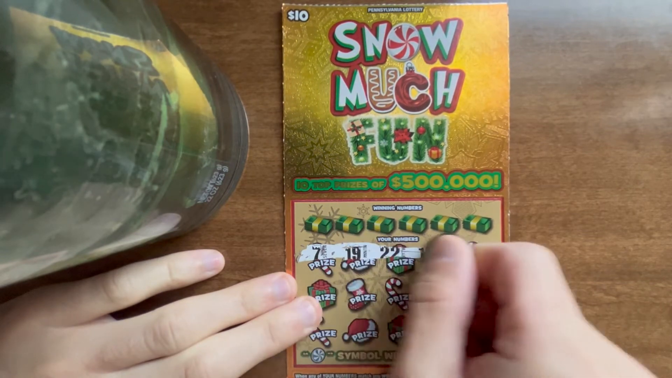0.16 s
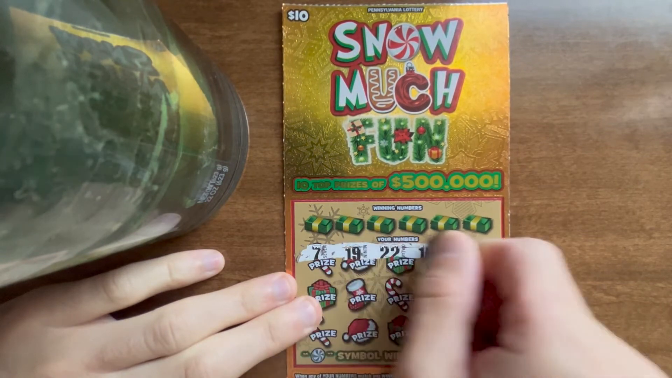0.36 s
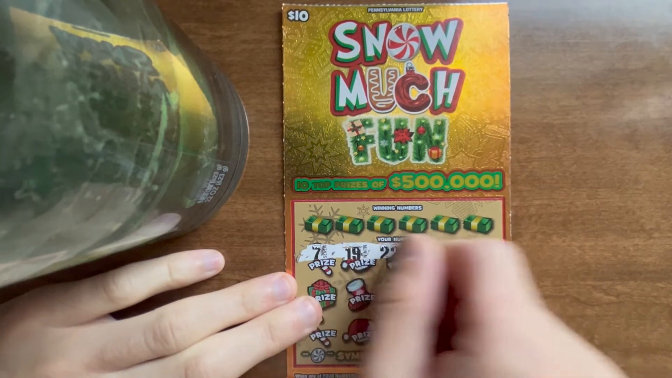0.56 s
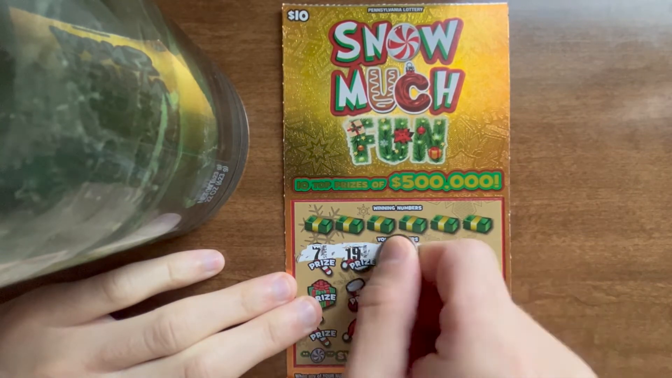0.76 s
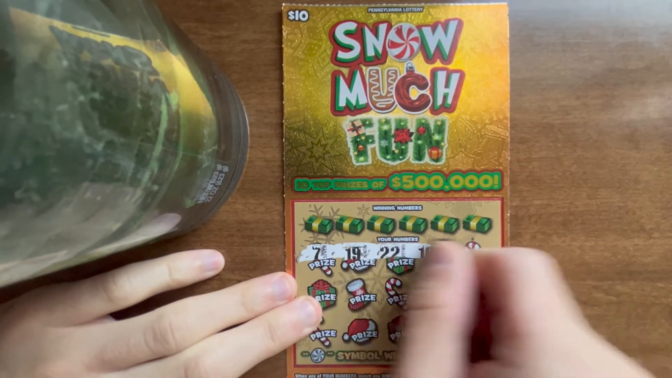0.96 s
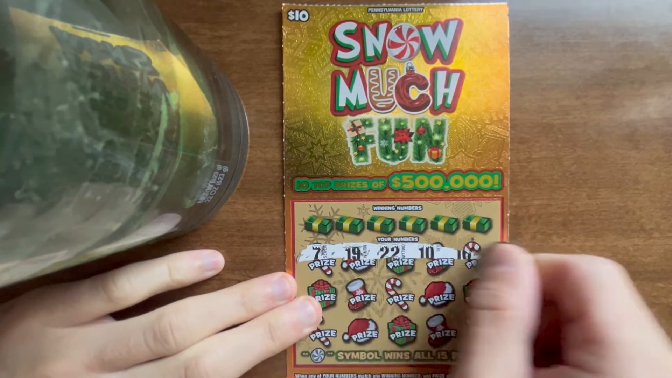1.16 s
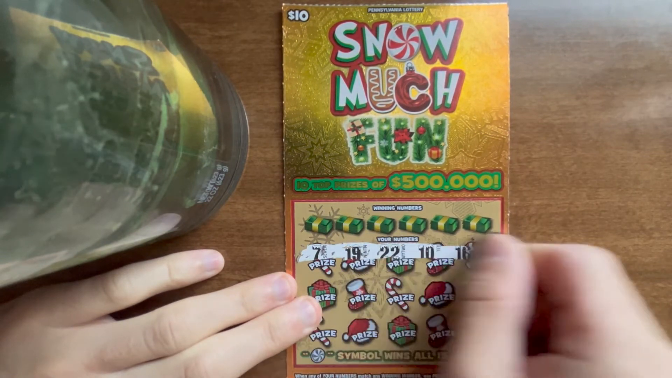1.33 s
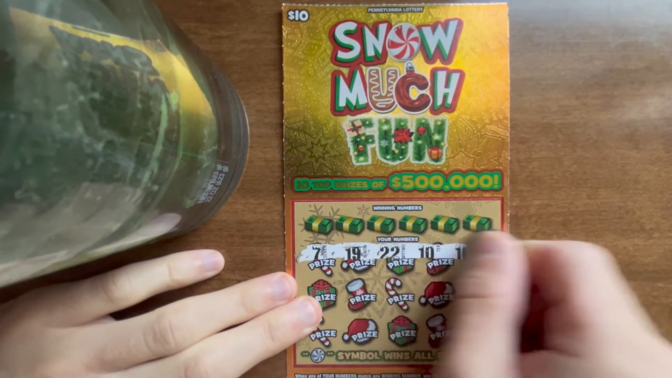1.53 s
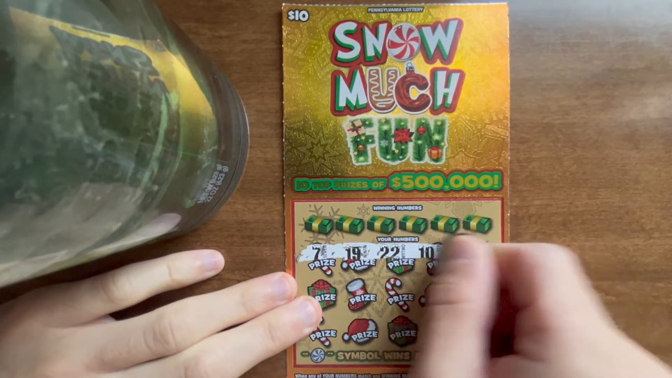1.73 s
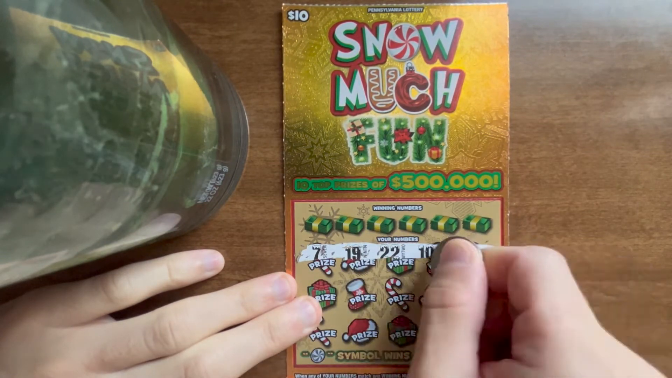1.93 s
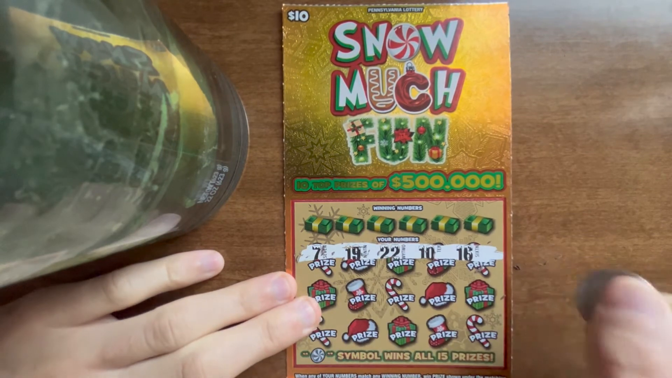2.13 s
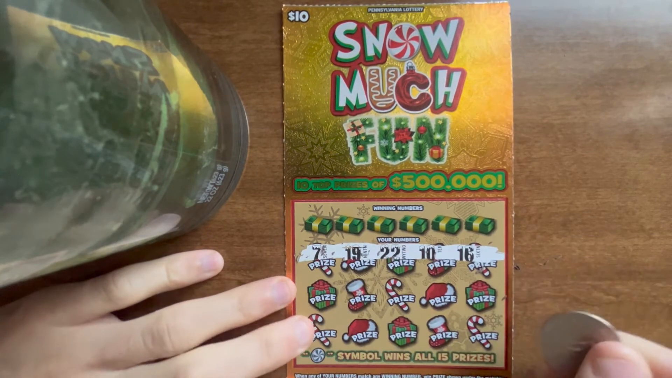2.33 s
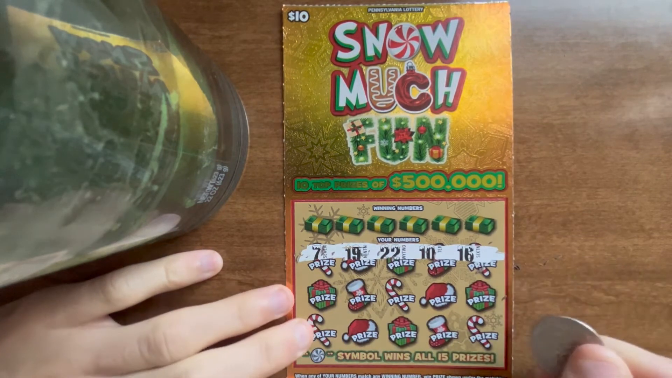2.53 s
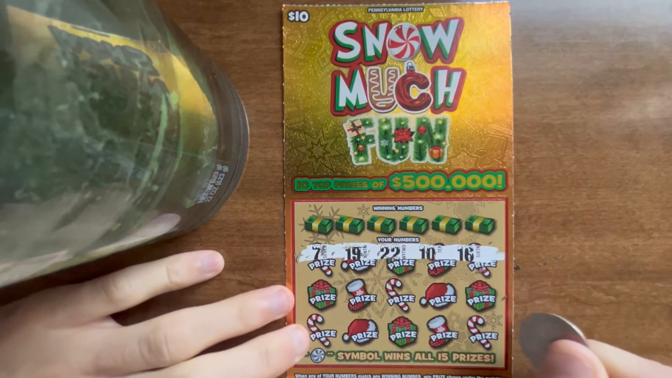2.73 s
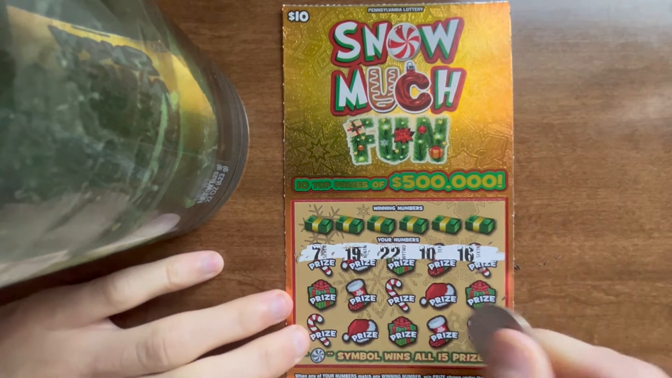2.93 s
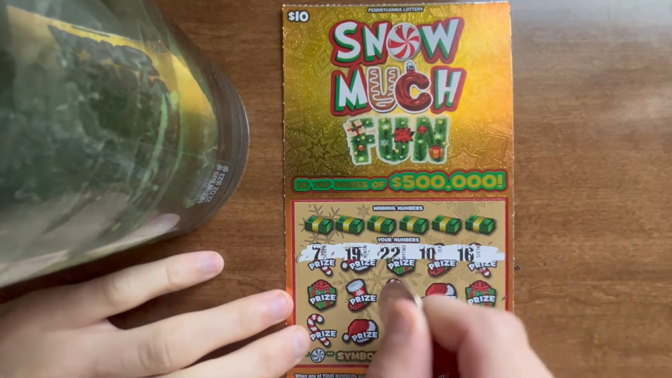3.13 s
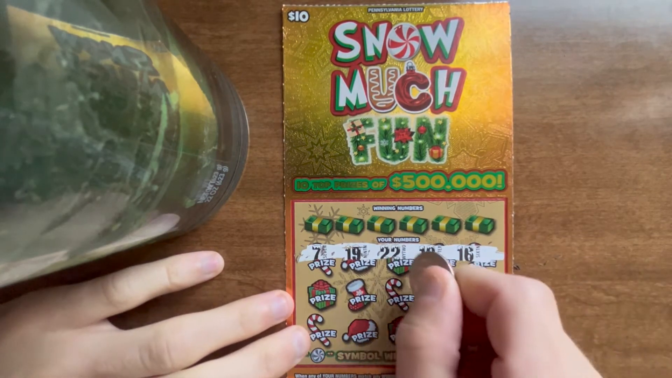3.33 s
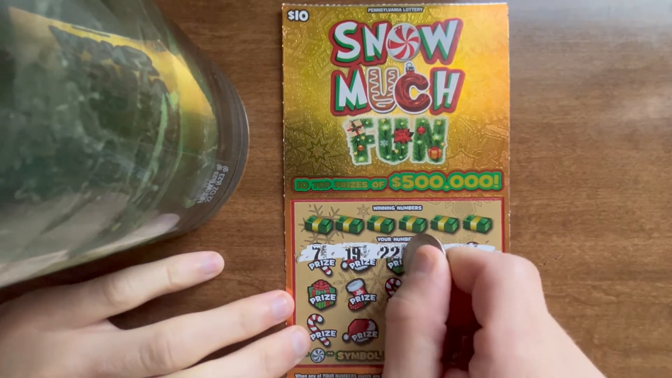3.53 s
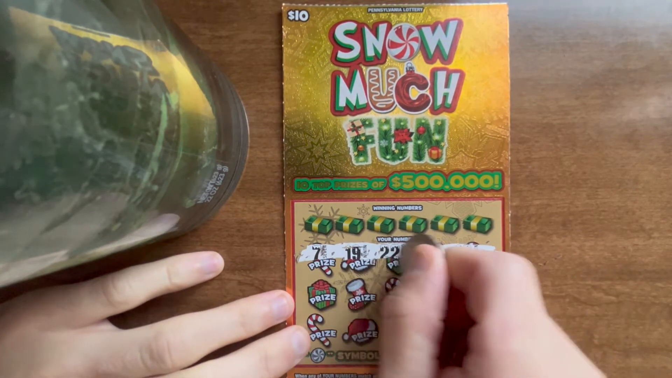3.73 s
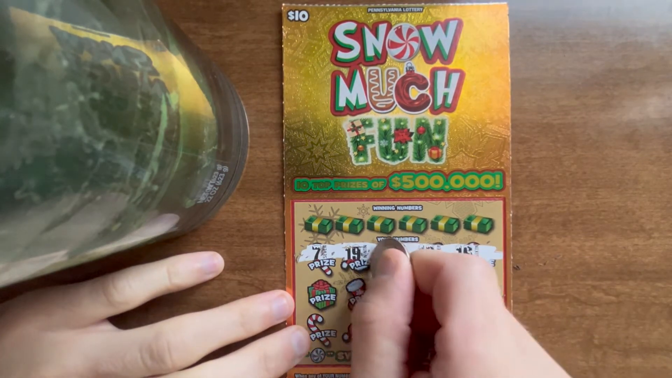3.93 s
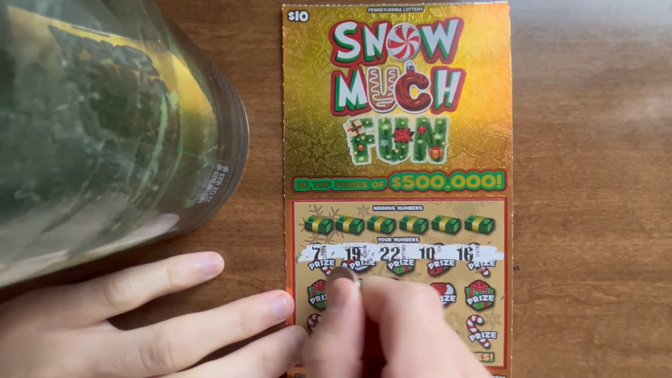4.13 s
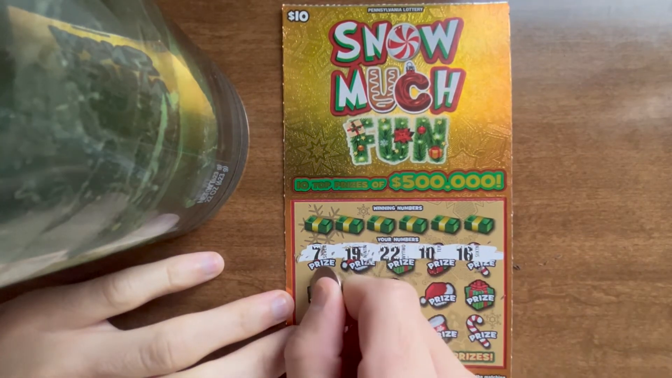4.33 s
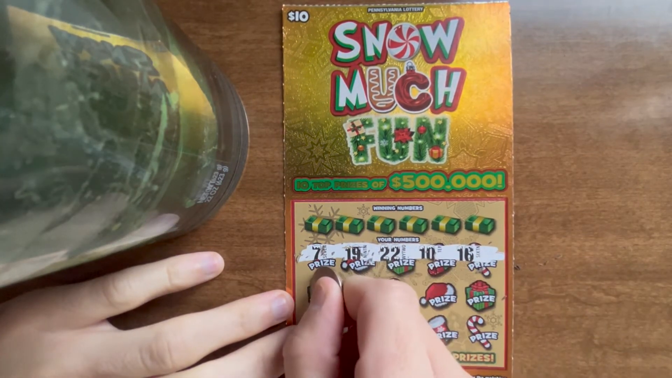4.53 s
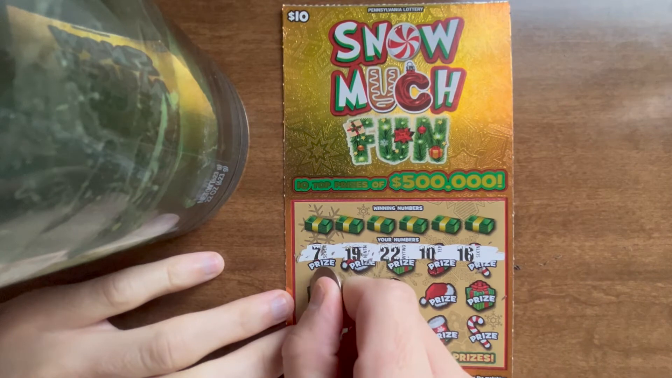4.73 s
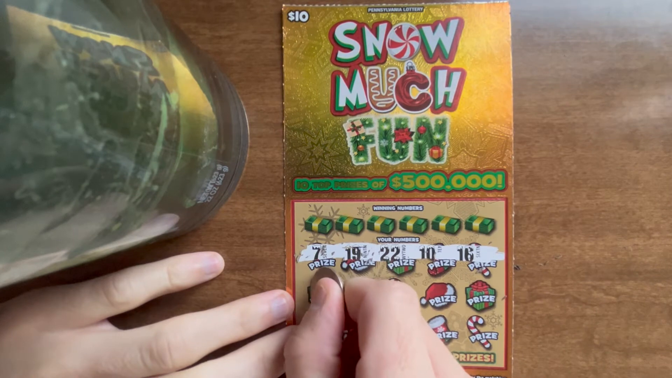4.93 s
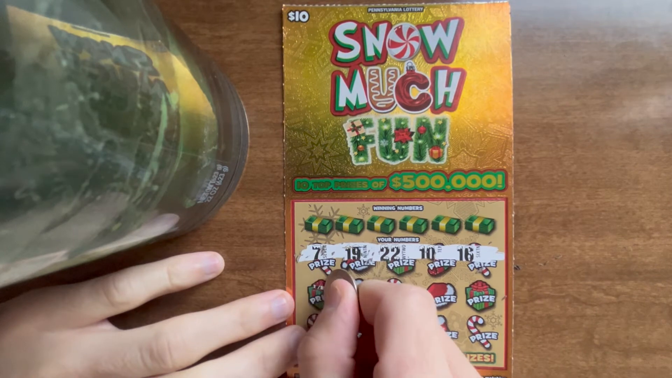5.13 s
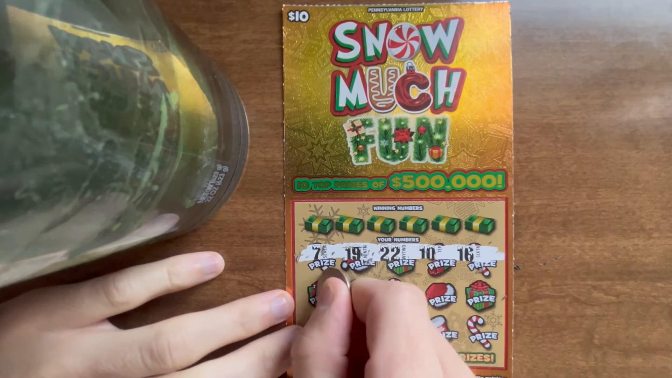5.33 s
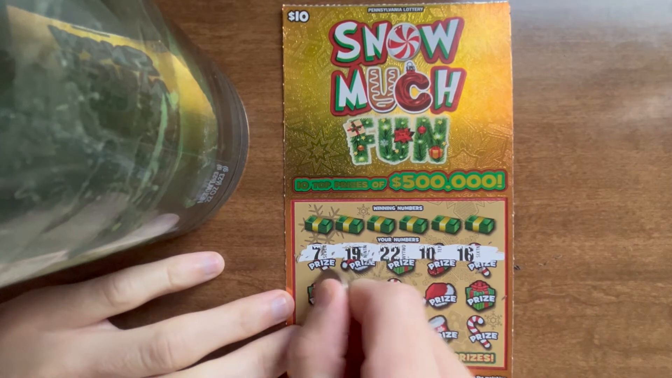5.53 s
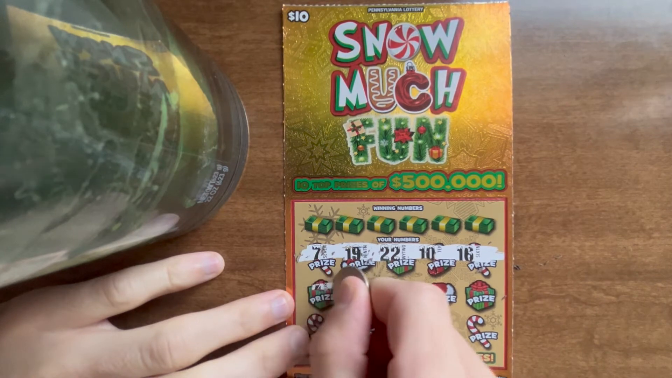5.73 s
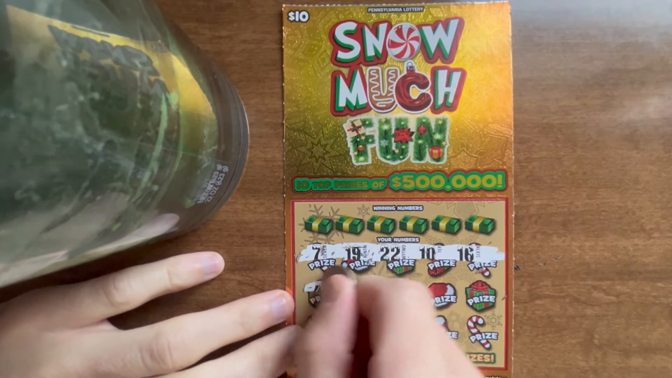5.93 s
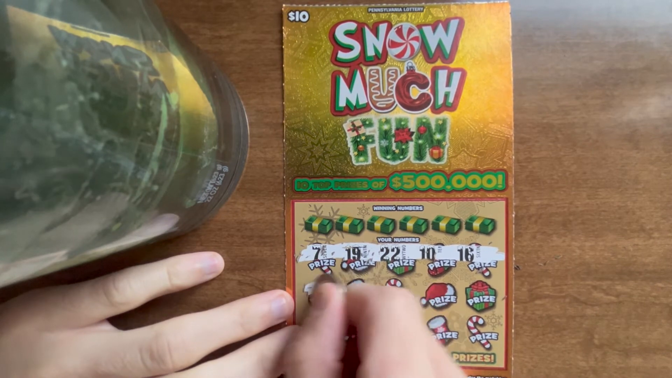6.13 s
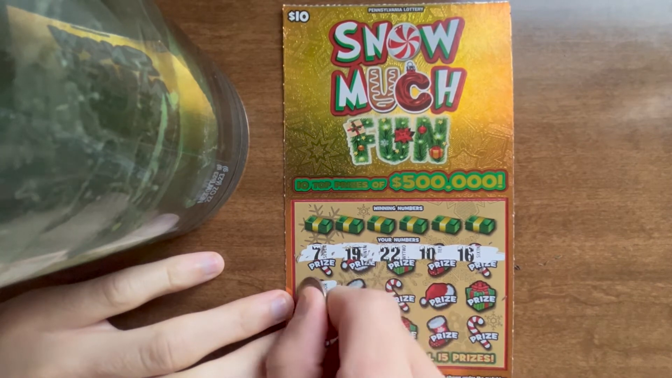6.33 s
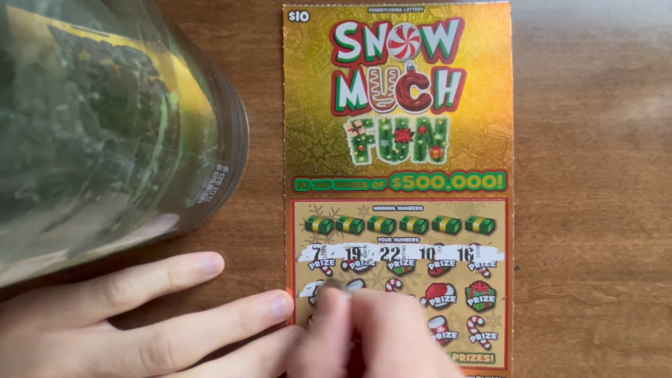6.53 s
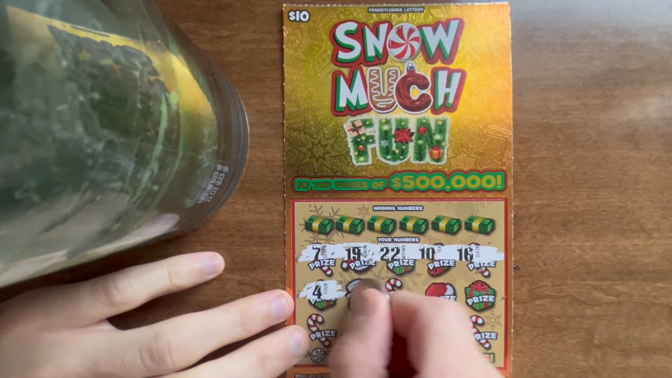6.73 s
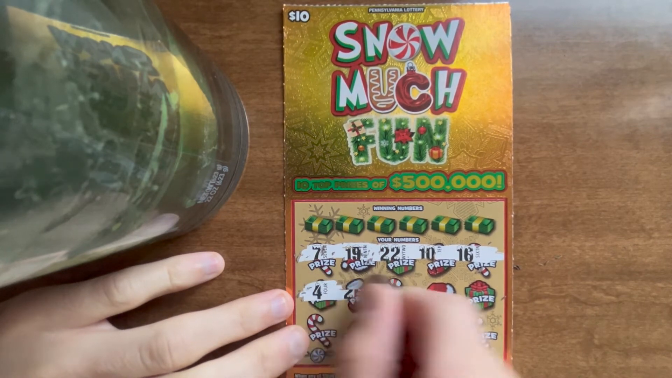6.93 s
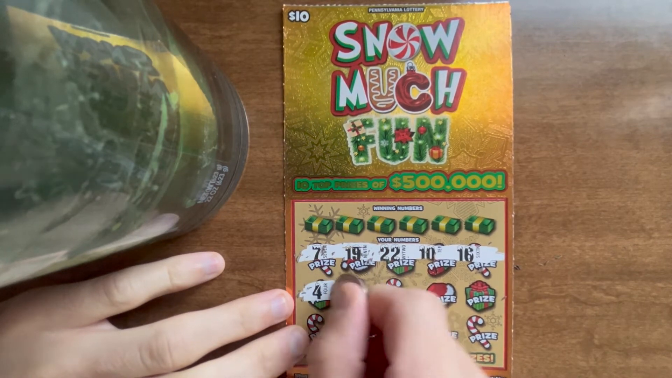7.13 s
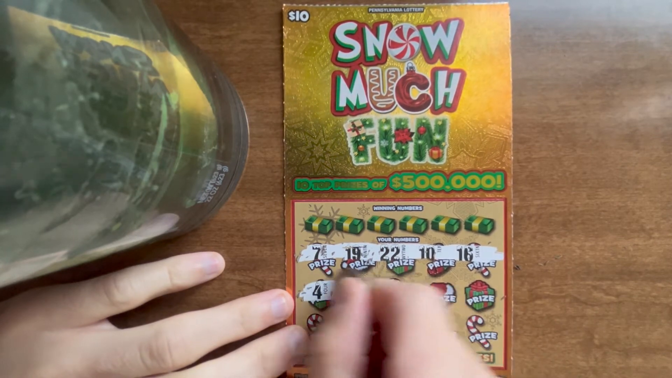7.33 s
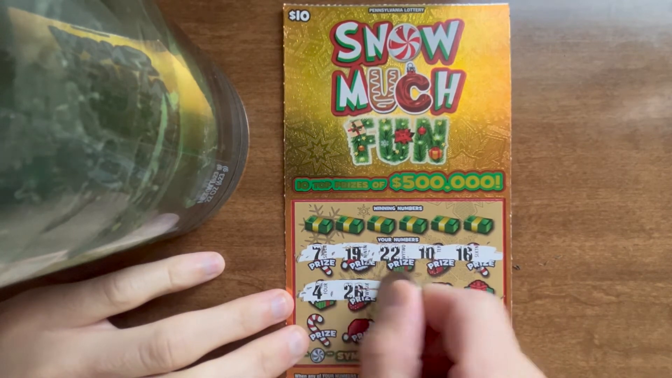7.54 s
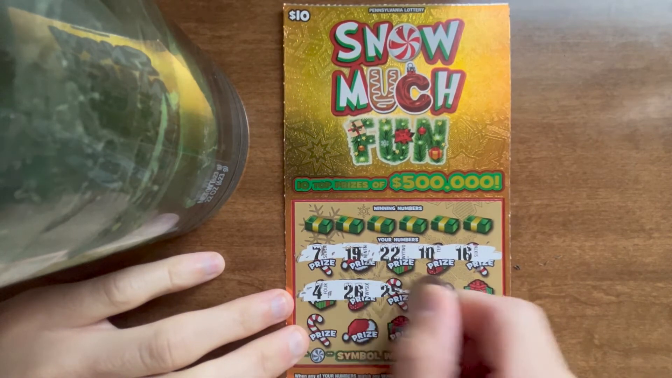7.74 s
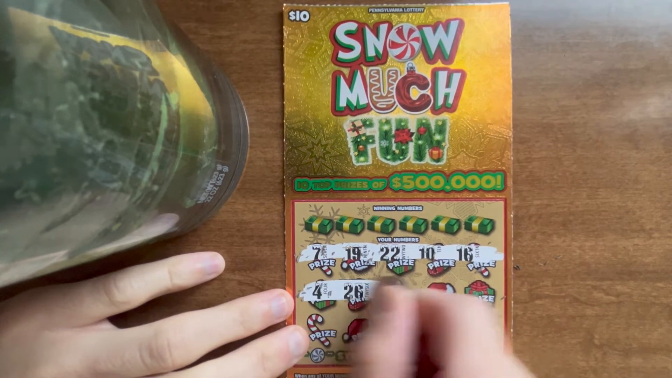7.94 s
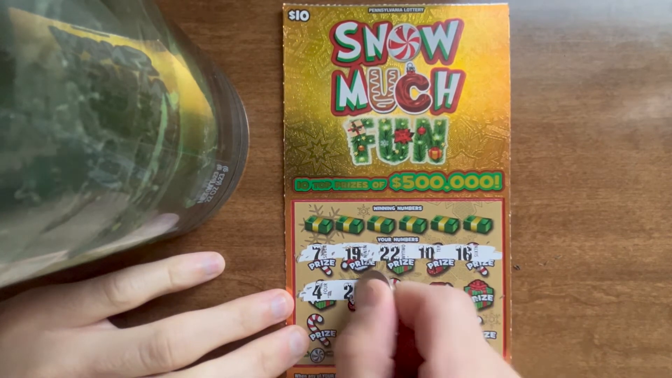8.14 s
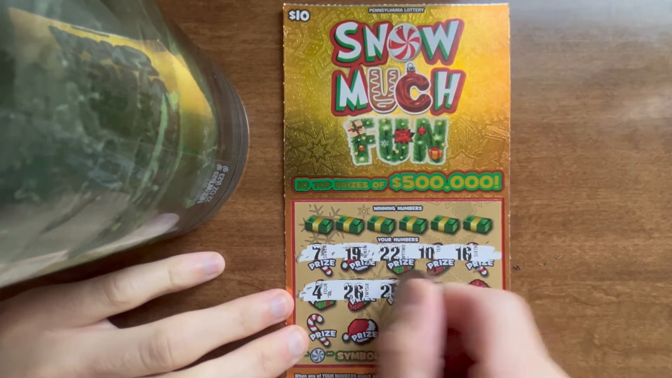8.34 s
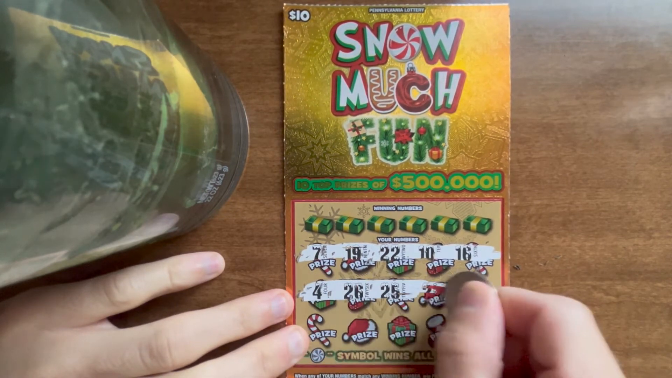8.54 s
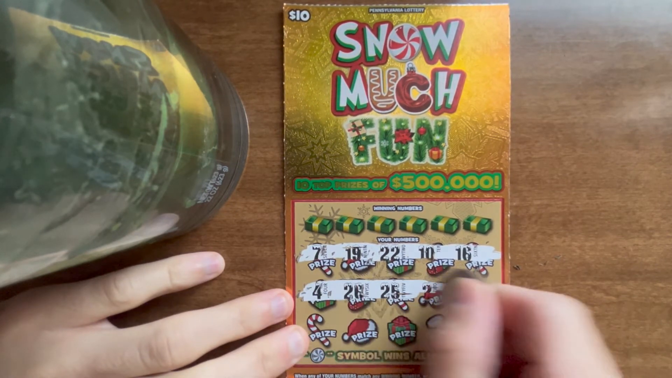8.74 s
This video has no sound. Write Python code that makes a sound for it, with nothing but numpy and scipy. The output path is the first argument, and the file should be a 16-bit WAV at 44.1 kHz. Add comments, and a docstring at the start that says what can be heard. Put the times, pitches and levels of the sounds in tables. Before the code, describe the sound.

Close, brisk coin scratching rasps over card in two long bursts, with small taps and low table thumps between, in a small quiet room.

```python
"""Coin scratching a paper ticket

A coin scratches the coating off a paper ticket on a wooden table, close to a two-port microphone in a small room.
It goes to and fro about four times a second: a bright, biting push, then a duller pull. Noise grains and uneven
slips ring coin, card and table top in four voices; low noise bands are the hand rocking and thumping the table.
Coin and fingers tap during the strokes and in the pauses, over short echoes, faint hiss, a drone and a hum."""
import sys
import numpy as np
from scipy import signal
from scipy.fft import rfft, irfft
from scipy.io import wavfile
from scipy.ndimage import uniform_filter1d

SR = 44100
rng = np.random.default_rng(int(sys.argv[2]) if len(sys.argv) > 2 else 0)


def store_wav(level_fs):
    """Save 16-bit WAV to argv[1]."""
    pcm = np.round(np.clip(np.atleast_2d(level_fs), -1, 1) * 32767)
    wavfile.write(sys.argv[1], SR, pcm.T.astype(np.int16))


N = 386757
TIME = np.arange(N) / SR
BODY_TAPS = 8192  # length of the body response in samples


def from_db(db):
    """Decibels to gain."""
    return 10 ** (np.asarray(db) / 20)


def unit(x):
    """Scales to rms 1."""
    return x / np.sqrt(np.mean(x ** 2) + 1e-20)


def steadied(x, count):
    """Evens out the power of a sound over spans of count samples."""
    power = uniform_filter1d(np.mean(x ** 2, axis=0), count)
    return x / np.sqrt(np.abs(power) + 1e-12)


def read(points, hz):
    """Reads every column of a table on a log-frequency axis."""
    f, *columns = np.transpose(points)
    return np.array([np.interp(np.log(hz + 1), np.log(f + 1), c) for c in columns])


def waver(rate_hz):
    """Smooth random motion of rms 1 that changes up to about this rate."""
    hz = np.fft.rfftfreq(N, 1 / SR)
    spectrum = rfft(rng.standard_normal(N)) / (1 + (hz / rate_hz) ** 4)
    return unit(irfft(spectrum, N))


def narrow_noise(hz, width_hz):
    """Complex noise in one resonance; its real part has rms about 1."""
    r = np.exp(-1.5 * np.pi * width_hz / SR)  # two equal poles
    a, b = signal.lfilter([1], [1, -2 * r, r * r], rng.standard_normal((2, N)))
    return (unit(a) + 1j * unit(b)) * np.exp(2j * np.pi * hz * TIME)


def speed(start, end, fastest):
    """One stroke of the hand: from rest up to speed 1 and back to rest."""
    u = np.arange(int((end - start) * SR)) / SR / (end - start)
    fastest = np.clip(fastest, .05, .95)
    return np.sin(np.pi / 2 * np.minimum(u / fastest, (1 - u) / (1 - fastest)))


# after each turn the coin glides with part of its grip, then digs in quickly
GLIDE_GRIP, DIG_IN_S = 0.65, .01


def strokes(rows, effort_law, speed_law):
    """Strength of a run of strokes, as powers of their effort and speed; each glides in lightly, then digs."""
    out = np.zeros(N + 2 * SR)  # a second spare at either end
    for start, end, effort_db, fastest, glide_s in rows:
        motion = speed(start, end, fastest)
        grip = np.interp(TIME[:len(motion)], [glide_s, glide_s + DIG_IN_S], [GLIDE_GRIP, 1])
        stroke = from_db(effort_law * effort_db) * (grip * motion) ** speed_law
        out[SR + int(start * SR):][:len(motion)] += stroke
    return out[SR:SR + N]


def jolts(rows, rise_s):
    """Sudden jolts (t/s, decay time/s, gain) that rise quickly and die away."""
    out = np.zeros(N)
    for s, decay, gain in rows:
        span = slice(int(s * SR), int(s * SR) + SR // 2)
        age = np.maximum(TIME[span] - s, 0)
        out[span] += gain * np.minimum(age / rise_s, 1) * np.exp(-age / decay)
    return out


def knocks(rows, contact_s=0.002):
    """Each jolt starts with one clean blow, whose energy grows with the jolt's size and length up to contact_s."""
    out = np.zeros(N)
    for s, decay, gain in rows:
        out[int(s * SR) + 30] = gain * np.sqrt(min(decay, contact_s) * SR / 2)
    return out


# colour of the faint hiss: f/Hz, relative level/dB per Hz
HISS_COLOUR = [(15, -63), (25, -20.5), (43, 0), (64, -5), (80, -16.5), (114, -13), (190, -12), (240, -9),
               (300, -23), (420, -26), (775, -35.5), (1700, -35.5), (3000, -40), (4700, -39.5),
               (7000, -45.5), (11000, -50), (13000, -54.5), (16000, -51)]
HISS_DB = -68.5
# low drone of the room: f/Hz, width/Hz, level/dB
DRONE = [(55, 7.8, -74.5), (114.3, 24, -73.5), (158.5, 12, -82.5)]
HUM_HZ, HUM_DB = 236, -73.5


def background():
    """Hiss is coloured noise, the drone noise in low resonances, the hum a sine whose pitch wavers slightly."""
    hz = np.fft.rfftfreq(N, 1 / SR)
    mid, side = rfft(rng.standard_normal((2, N))) * from_db(read(HISS_COLOUR, hz))
    # side against mid: f/Hz, level/dB
    side = side * from_db(read([(100, -1.6), (600, 1), (5000, -1.5)], hz)[0])
    hiss = irfft(np.array([mid + side, mid - side]), N)
    drone = sum(from_db(db) * narrow_noise(f, width).real for f, width, db in DRONE)
    turns = np.cumsum(HUM_HZ + 1.5 * waver(4.4)) / SR
    hum = from_db(HUM_DB) * np.sqrt(2) * np.sin(2 * np.pi * turns)
    return from_db(HISS_DB) * unit(hiss) + drone + hum


# room decay: f/Hz, t60/s
ROOM_DECAY = [(100, 0.67), (400, 0.18), (1500, 0.18), (5000, 0.2), (14000, 0.11)]


def room(x):
    """Sparse reflections from the walls, each band dying at its own speed."""
    count = SR // 2
    signs = rng.choice([-1., 1.], (2, count))
    hits = rng.random((2, count)) < 3000 / SR  # about 3000 reflections a second
    taps = signs * hits * (TIME[:count] > .004)
    hz, t, z = signal.stft(taps, SR, nperseg=256)
    tail = signal.istft(z * from_db(-60 * t / read(ROOM_DECAY, hz).T), SR, nperseg=256)[1]
    tail /= np.linalg.norm(tail, axis=1, keepdims=True)
    return signal.oaconvolve(x, tail, axes=1)[:, :N]


# the coin is pushed, edge first: start t/s, end t/s, effort/dB,
# share of the stroke at which it is fastest, glide before it digs in/s
PUSHES = [(-0.027, 0.126, 1.5, 0.61, 0.049), (0.233, 0.396, 3, 0.45, 0.037),
          (0.462, 0.626, -2.0, 0.73, 0.045), (0.713, 0.878, -1, 0.78, 0.042),
          (0.971, 1.133, -2, 0.58, 0.037), (1.225, 1.365, 3.5, 0.45, 0.061),
          (1.444, 1.585, 1.5, 0.41, 0.023), (1.649, 1.791, -3, 0.85, 0.045),
          (1.889, 2.051, -7.5, 0.46, 0.027), (3.613, 3.748, -17, 0.49, 0.035),
          (5.298, 5.431, -7.5, 0.49, 0.032), (5.555, 5.715, -6, 0.68, 0.047),
          (5.81, 5.987, -3.0, 0.57, 0.026), (6.073, 6.194, -2.5, 0.68, 0.053),
          (6.31, 6.444, 0.5, 0.64, 0.0095), (6.562, 6.698, -4.5, 0.98, 0.017),
          (6.823, 6.987, 3.5, 0.55, 0.064), (7.106, 7.243, 3, 0.39, 0.018), (7.35, 7.507, 3, 0.45, 0.042),
          (7.607, 7.752, 0.5, 0.74, 0.006), (7.85, 8.019, 2, 0.55, 0.079), (8.113, 8.271, 3.0, 0.47, 0.043),
          (8.357, 8.505, -1.5, 0.8, 0.023), (8.61, 8.776, -2.0, 0.61, 0.04)]
# the coin is pulled back, edge trailing: same columns as the pushes
PULLS = [(0.091, 0.27, -2.5, 0.35, 0.033), (0.346, 0.504, -3, 0.45, 0.038), (0.605, 0.763, 0, 0.15, 0.022),
         (0.856, 1.03, 3, 0.26, 0.022), (1.101, 1.261, -2, 0.25, 0.027), (1.328, 1.464, 0, 0.22, 0.03),
         (1.534, 1.682, -6, 0.65, 0.041), (1.793, 1.921, 1, 0.08, 0.015), (3.501, 3.651, -11, 0.37, 0.05),
         (3.747, 3.907, -3, 0.41, 0.025), (4.901, 5.113, -8, 0.15, 0.0069),
         (5.127, 5.296, -13, 0.36, 0.041), (5.407, 5.492, -8, 0.72, 0.039),
         (5.469, 5.566, -6.5, 0.53, 0.03), (5.697, 5.839, -2.0, 0.52, 0.046),
         (5.973, 6.094, -3, 0.46, 0.011), (6.158, 6.333, -1.0, 0.57, 0.045),
         (6.408, 6.591, -1.5, 0.55, 0.021), (6.702, 6.862, 1.0, 0.13, 0.02),
         (6.961, 7.107, 0.5, 0.37, 0.023), (7.207, 7.354, 0.5, 0.49, 0.025), (7.496, 7.628, -1, 0.1, 0.013),
         (7.736, 7.893, 3.5, 0.32, 0.01), (7.986, 8.125, 1, 0.48, 0.023), (8.228, 8.369, 1, 0.48, 0.03),
         (8.497, 8.658, 0, 0.14, 0.022)]
# weight of the hand on the table before it rocks, one list a spell: t/s, level/dB
HAND_WEIGHT = [
    [(0, -47), (0.45, -48), (0.9, -48.5), (1.3, -46.0), (1.65, -47), (2.0, -49), (2.13, -73)],
    [(3.5, -54.5), (3.7, -59.5), (3.85, -48), (4.0, -60)],
    [(4.89, -55.5), (4.98, -51.5), (5.5, -52), (6.1, -52.5), (6.8, -49), (7.4, -49), (8.1, -47),
     (8.77, -47)],
]
# the hand bumps the table: t/s, level/dB
THUMPS = [(0.649, -39), (0.889, -36), (1.07, -41), (1.804, -32), (1.996, -45.5), (2.163, -49), (2.241, -59),
          (2.305, -52), (2.61, -56.5), (3.446, -44.5), (3.599, -45), (3.799, -48.5), (4.08, -61.5),
          (4.245, -59), (5.15, -46), (5.777, -42), (6.27, -43), (7.044, -54), (7.31, -43), (7.82, -39),
          (8.08, -53), (8.452, -40), (8.554, -45), (8.6, -44)]
THUMP_RISE_S, THUMP_DECAY_S = 0.0027, .05
# low modes of the table: f/Hz, width/Hz, relative level/dB, left minus right/dB, left lead/rad
TABLE_MODES = [(64.7, 18, -5.5, 5, 0.91), (107.4, 18, 1.5, 0.5, -1.3), (143, 35, -3, -1, -1.7),
               (187.3, 93, -7, 5.5, 0.67), (260.8, 15, -2.5, -1, -1.73)]
# shaking per unit of weight; it lags the stroke
ROCK_REST, ROCK_PUSH, ROCK_PULL, ROCK_LAG_S = 0.73, .15, .55, 0.027
UNLIKE_AT_PORTS = .65  # share of independent noise between the ports


def table():
    """The rocking hand and its bumps shake the low table modes, which reach the two ports a little differently."""
    weight = np.zeros(N)
    for spell in HAND_WEIGHT:
        t, db = np.transpose(spell)
        weight += np.interp(TIME, t, from_db(db), left=0, right=0)
    weight = uniform_filter1d(weight, size=1500)  # the hand settles and lifts gently
    rock = ROCK_REST + ROCK_PUSH * strokes(PUSHES, 0, 1) + ROCK_PULL * strokes(PULLS, 0, 1)
    rocking = weight * np.interp(TIME - ROCK_LAG_S, TIME, rock)
    thumps = jolts([(s, THUMP_DECAY_S, from_db(db)) for s, db in THUMPS], THUMP_RISE_S)
    sides, shake = np.array([[.5], [-.5]]), 0
    for hz, width, db, pan_db, lead in TABLE_MODES:
        ring = narrow_noise(hz, width) + UNLIKE_AT_PORTS * sides * narrow_noise(hz, width)
        shake = shake + (from_db(db + sides * pan_db) * np.exp(1j * sides * lead) * ring).real
    return np.hypot(rocking, thumps) * steadied(shake, count=2400)


# slow pulls make the table groan: start t/s, end t/s, f/Hz, level at the right port/dB
GROANS = [(0.107, 0.282, 276, -42), (0.618, 0.806, 272, -43), (1.8, 1.92, 255, -56),
          (4.944, 5.11, 270, -46.5), (5.15, 5.31, 271, -61)]


def groans():
    """The dragging hand locks on to one low mode of the table: a brief, swaying sine, softer at the left port."""
    out, sway = np.zeros((2, N)), np.cumsum(5 * waver(25)) / SR
    for start, end, hz, db in GROANS:
        span = slice(int(start * SR), int(end * SR))
        phase = 2 * np.pi * (hz * TIME[span] + sway[span])
        swell = from_db(db) * np.sqrt(2) * signal.windows.tukey(len(phase), .7)
        out[:, span] += swell * np.array([0.5 * np.sin(phase), np.cos(phase)])
    return out


def clink(s=3.412, hz=3450, width_hz=260, decay_s=0.008, db=-59):
    """The coin's rim grazes the card with one small ping of uneven phase just before it lands."""
    age = np.maximum(TIME - s, 0)
    ring = np.cos(np.angle(narrow_noise(hz, width_hz)))
    ping = from_db(db) * np.minimum(age / 0.00067, 1) * np.exp(-age / decay_s) * ring
    return ping * from_db([[-2], [0]])  # left, right


def causal(db):
    """Spectrum of the promptest (minimum-phase) response that has these gains."""
    cepstrum = irfft(np.log(from_db(np.maximum(db, -100))))
    cepstrum[:, 1:BODY_TAPS // 2] *= 2
    cepstrum[:, BODY_TAPS // 2 + 1:] = 0
    return np.exp(rfft(cepstrum))


# resonances of table top, card and coin: f/Hz, width/Hz, lift at left port/dB, lift at right port/dB
BODY_MODES = [(376.8, 71, -12, 8), (465, 44, 8, 7), (570, 320, 0.5, 1.5), (690, 120, 14.5, 8),
              (839, 88, 1, 11), (930, 43, 12.5, 6.5), (1068, 190, 14, 3), (1167, 80, 14, 8),
              (1264, 46, 11.5, 0), (1436.5, 110, 8, 5.5), (1464.8, 29, 9, 6.5), (1724, 140, 0, 11.5),
              (1882, 330, 13.5, 3), (2150, 120, -1.5, 8), (2310, 25, -14.5, 7), (2653, 121, 11.5, 4),
              (2830, 370, -2.5, 9), (3115, 120, -1.5, -13), (3176, 110, 4.5, 14.5), (4064, 276, -18.5, 9.5),
              (4417, 190, 24.5, 0.5), (4630, 550, -5, -5), (4760, 900, -10, 3.5), (5590, 160, 6.5, -3.5)]
# broad colour under the resonances: f/Hz, left relative level/dB, right relative level/dB
BODY_COLOUR = [(147, 0.5, 0), (300, 4, 0.5), (1000, -11, -2), (1930, 2, 4), (2980, -8, -9.5),
               (4860, -13, -5), (6050, -27.5, -14), (8500, -11, -9.5), (10250, -5.5, -8.5),
               (12960, -31, -23.5), (12800, -19.5, -32), (16000, -36.5, -29)]
# phase by which the left port leads, negative where it lags: f/Hz, phase/rad
PORT_PHASE = [(30, 0), (100, -1.1), (400, -1.3), (560, -2.6), (1250, -3.3), (1500, -4.3), (1750, -4.3),
              (2000, -5.7), (2300, -7.6), (2650, -6.8), (3200, -9), (5500, -15.6), (8800, -20.9),
              (10500, -16.8), (12000, -15.8), (13500, -15.6), (14500, -12.6)]


def body(colour):
    """Response from the coin's edge to both ports for one voice of the friction, mean energy 1 a port."""
    hz = np.fft.rfftfreq(BODY_TAPS, 1 / SR)
    db = read(BODY_COLOUR, hz) + read(colour, hz)
    for mode_hz, width_hz, left_db, right_db in BODY_MODES:
        db = db + np.array([[left_db], [right_db]]) / (1 + (2 * (hz - mode_hz) / width_hz) ** 2)
    spectrum = causal(db) * np.exp(.5j * read(PORT_PHASE, hz) * np.array([[1], [-1]]))
    centred = np.roll(irfft(spectrum), BODY_TAPS // 2, axis=1)
    return unit(centred) / np.sqrt(BODY_TAPS)


# the edge catches in the coating during a stroke: t/s, strength/dB
CATCHES = [(0.036, 2), (0.281, 3), (0.58, 4.5), (0.642, 3), (0.827, 3.5), (0.889, -5), (1.081, 5),
           (1.479, -7), (1.752, 3), (1.817, -5.5), (4.916, -25), (6.141, -1), (6.216, -13), (6.652, 3),
           (7.41, -14), (7.687, 6), (7.765, -2.5), (7.932, -12), (8.27, -11), (8.452, 7.5), (8.728, 6)]
CATCH_RISE_S, CATCH_DECAY_S, CATCH_HARDNESS = .001, 0.014, .3
# coin or fingers knock on the card: t/s, decay time/s, dull knock level/dB, bright click level/dB
TAPS_ON_CARD = [(0.646, .015, -28.5, -43), (1.817, 0.0081, -35, -53), (1.995, 0.0041, -23, -47.5),
                (2.16, 0.003, -43.5, -53), (2.244, .003, -46.5, -68), (2.332, .008, -68, -63.5),
                (2.606, 0.007, -53, -72.5), (3.443, 0.005, -26.5, -67), (3.809, 0.0052, -24, -44),
                (4.242, .006, -60, -77.5), (5.347, 0.032, -31.5, -65), (6.496, 0.0066, -28, -49.5),
                (6.998, 0.023, -24.5, -62)]
TAP_RISE_S, TAP_HARDNESS = .0005, 0.45
# how much of a tap each voice takes: share of the knock, share of the click
TAP_SHARES = {"drag": (0.71, 0), "rasp": (0.12, 0.33), "bite": (0, 1), "fizz": (0, 1)}
# how each voice answers the hand: push level/dB, pull level/dB, catch level/dB,
# dB per dB of effort, power of speed
RESPONSE = {"drag": (-39, -36.5, -38.5, 0.57, 1.76), "rasp": (-37.5, -41, -35.5, 0.96, 2),
            "bite": (-38.5, -47, -39.5, 1.68, 2.7), "fizz": (-45.5, -44.5, -44, 2.27, 3.5)}


def pressure(voice):
    """Friction and blows that drive one voice, each voice with its own laws of effort and speed."""
    push_db, pull_db, catch_db, effort_law, speed_law = RESPONSE[voice]
    knock_share, click_share = TAP_SHARES[voice]
    pushing = from_db(push_db) * strokes(PUSHES, effort_law, speed_law)
    pulling = from_db(pull_db) * strokes(PULLS, effort_law, speed_law)
    caught = [(s, CATCH_DECAY_S, from_db(catch_db + db)) for s, db in CATCHES]
    tapped = [(s, decay, knock_share * from_db(knock_db) + click_share * from_db(click_db))
              for s, decay, knock_db, click_db in TAPS_ON_CARD]
    catching, tapping = jolts(caught, CATCH_RISE_S), jolts(tapped, TAP_RISE_S)
    strength = np.sqrt((pushing + pulling) ** 2 + catching ** 2 + tapping ** 2)
    blows = CATCH_HARDNESS * knocks(caught) + TAP_HARDNESS * knocks(tapped)
    return strength, blows


def slips(rate_hz, jitter, release):
    """The edge sticks and slips unevenly: a burst at each slip that fades through the cycle."""
    turns = np.cumsum(rate_hz * np.exp(jitter * waver(90))) / SR
    return unit(np.exp(-(turns % 1) / release))


def friction(colour, strength, blows, chatter, share, patchy_db, grain_db, likeness):
    """Grains of coating break in bursts under the slipping edge; they and the blows ring the body."""
    slip, patches = chatter
    sizes = np.minimum(rng.exponential(1, N), 6)
    grains = rng.standard_normal((2, N)) * from_db(grain_db * sizes)
    grains[1] = likeness * grains[0] + np.sqrt(1 - likeness ** 2) * grains[1]
    # the hand's push sets the power; the slips only share it out in time
    bursts = steadied(grains * (1 - share + share * slip), count=300)
    drive = bursts * unit(from_db(patchy_db * patches))
    rung = signal.oaconvolve(drive * strength + blows, body(colour), axes=1)
    return rung[:, BODY_TAPS // 2:][:, :N]


# colours of the four friction voices, dull to bright: f/Hz, relative level/dB
DRAG = [(60, -35.5), (160, -6), (260, -6), (400, 1), (1050, -3.5), (1400, -13.5), (2200, -43),
        (5000, -98.5)]
RASP = [(300, -48), (900, -14.5), (1270, 2), (2050, -8), (2450, -17.5), (3500, -25), (12000, -65.5)]
BITE = [(600, -58.5), (1850, -16.5), (2350, -2), (3500, 3), (4100, -5.5), (5300, 2), (7700, -26),
        (10000, -11), (12500, -3)]
FIZZ = [(800, -66.5), (3000, -24.5), (3900, 0), (6000, 11.5), (8000, -1.5), (10000, -4.5), (16000, 6)]
# fingertips brush lightly over the card: t/s, level/dB
BRUSHES = [(3.1, -78), (3.159, -78), (3.26, -78), (4.045, -68.5)]
BRUSH_RISE_S, BRUSH_DECAY_S = .015, .06


def coin():
    """All four voices share the same slips and uneven patches of coating; brushing fingers only fizz."""
    chatter = slips(rate_hz=480, jitter=.3, release=0.52), waver(60)
    fizz, fizz_blows = pressure("fizz")
    brush = jolts([(s, BRUSH_DECAY_S, from_db(db)) for s, db in BRUSHES], BRUSH_RISE_S)
    return (friction(DRAG, *pressure("drag"), chatter, share=0.15, patchy_db=2.04, grain_db=1, likeness=0.96),
            friction(RASP, *pressure("rasp"), chatter, share=0.31, patchy_db=2.1, grain_db=2.26, likeness=1.0),
            friction(BITE, *pressure("bite"), chatter, share=0.33, patchy_db=1.4, grain_db=3.9, likeness=0.5),
            friction(FIZZ, fizz + brush, fizz_blows, chatter,
                     share=0.46, patchy_db=2.6, grain_db=0.6, likeness=0.66))


def wander(x, depth_db):
    """As the coin travels, other narrow resonances of the card come forward and recede, less so in the bass."""
    hz, t, z = signal.stft(x, SR, nperseg=512, noverlap=384)
    patches = rng.standard_normal((len(t), len(hz))).T
    patches = uniform_filter1d(patches, size=22, axis=1)  # smooth in time, twice
    patches = uniform_filter1d(patches, size=10, axis=1)
    patches = unit(uniform_filter1d(patches, size=3, axis=0))  # and across frequency
    patches = np.minimum(patches, 1)  # cancellations cut deep, but peaks stay low
    gain = from_db(depth_db * np.clip(hz / 2500, .2, 1)[:, None] * patches)
    gain /= np.sqrt(np.mean(gain ** 2, axis=1, keepdims=True))
    return signal.istft(z * gain, SR, nperseg=512, noverlap=384)[1][:, :N]


def scene():
    """Background, table and groans under the coin, its ping and their echo in the room."""
    scratch, ping = sum(coin()), clink()
    echo = room(from_db(-11.5) * (scratch + ping))
    return background() + table() + groans() + echo + ping + wander(scratch, depth_db=6.0)


def record(dry):
    """Bass cut at 36 Hz and band limit at 15.9 kHz."""
    dry = signal.sosfilt(signal.butter(3, 36, "highpass", fs=SR, output="sos"), dry)
    band_limit = signal.firwin(511, 15900, window=("kaiser", 9), fs=SR)
    return signal.oaconvolve(dry, band_limit[None], "same")


dry = scene()
out = record(dry)
store_wav(out)
```